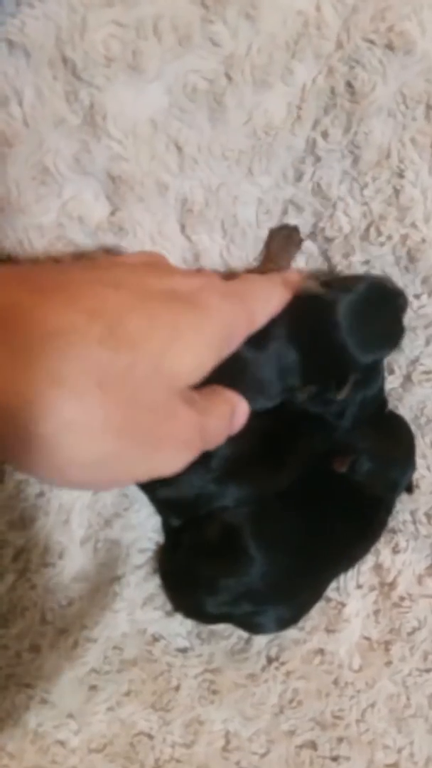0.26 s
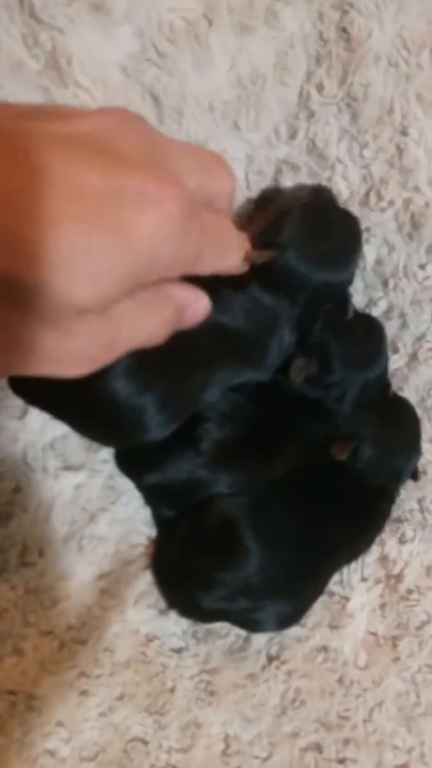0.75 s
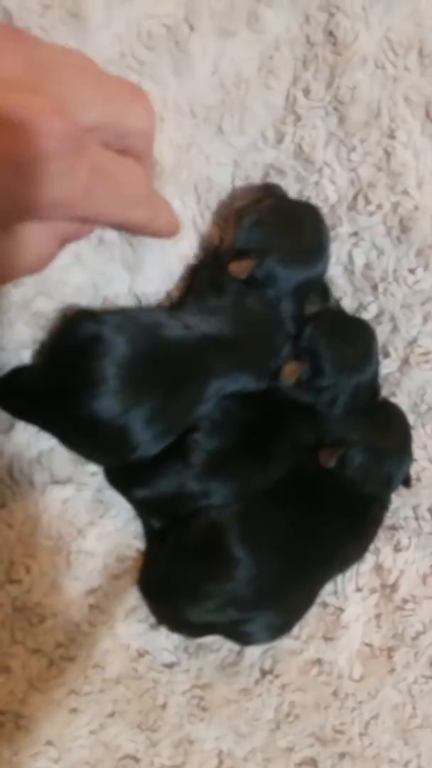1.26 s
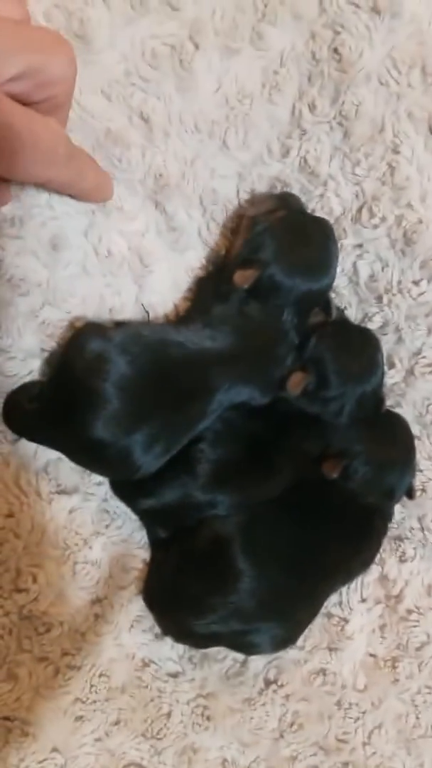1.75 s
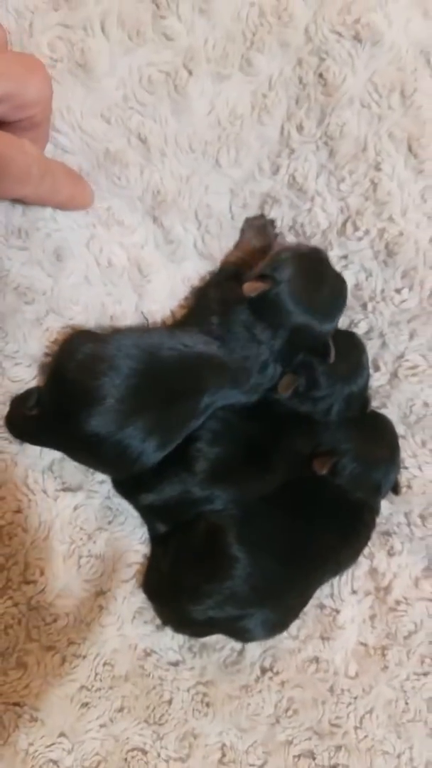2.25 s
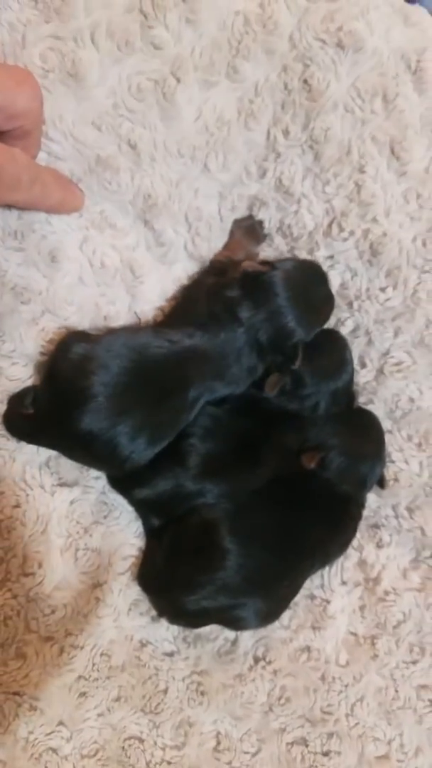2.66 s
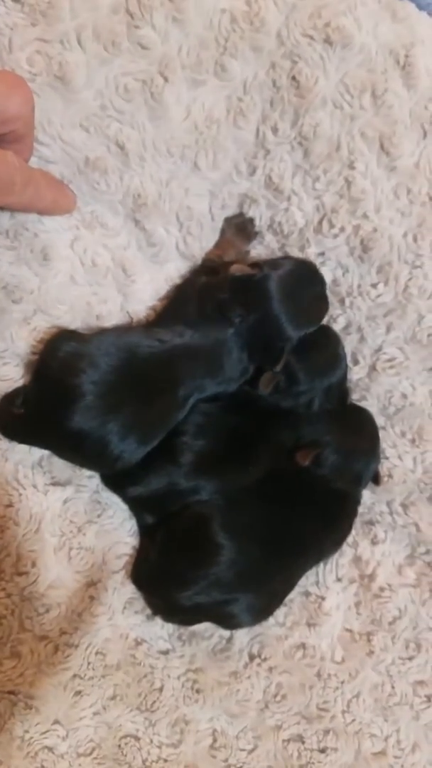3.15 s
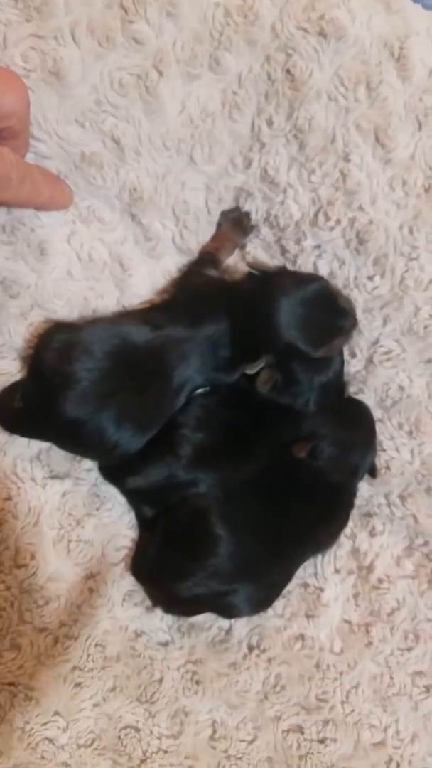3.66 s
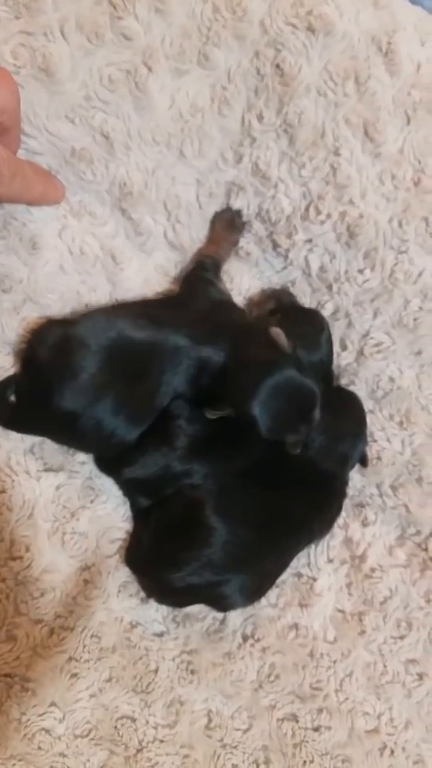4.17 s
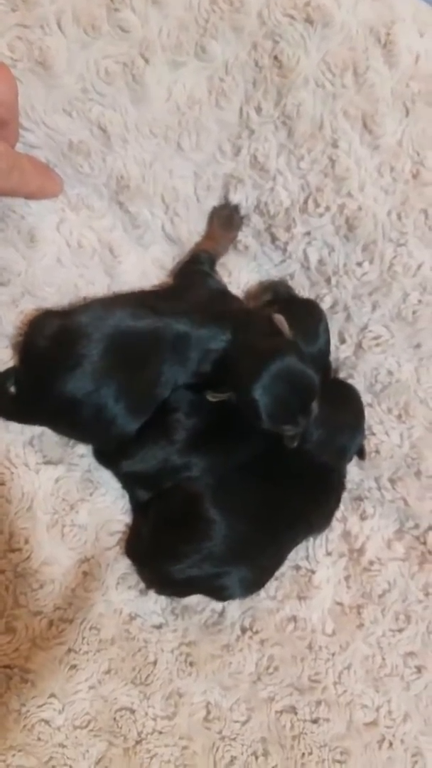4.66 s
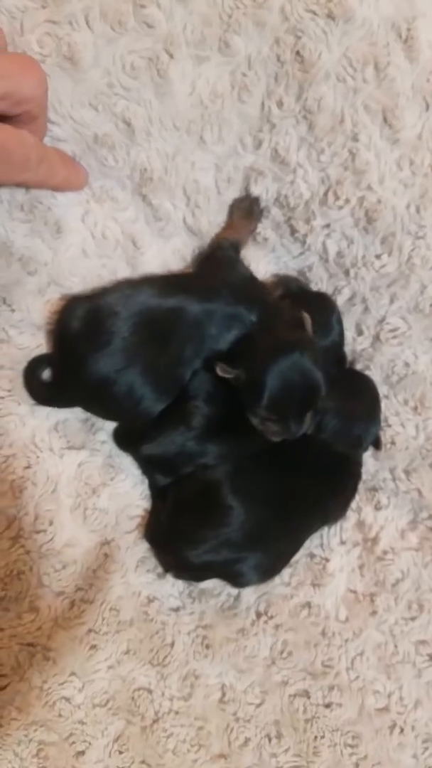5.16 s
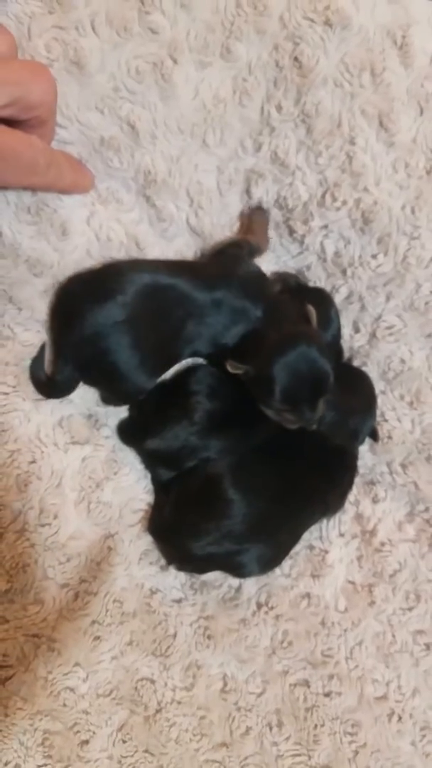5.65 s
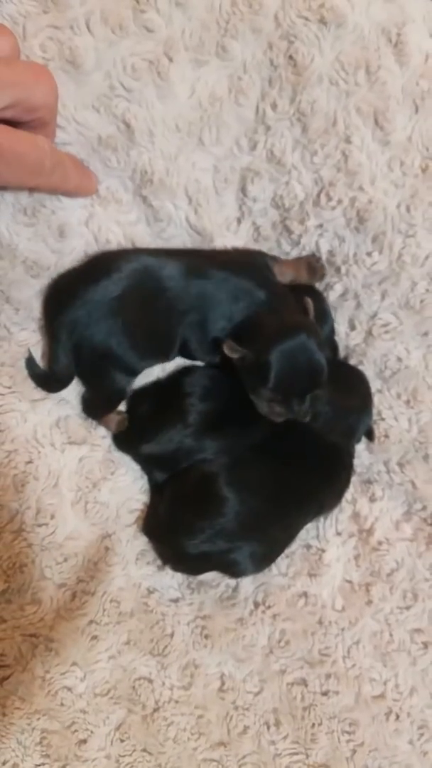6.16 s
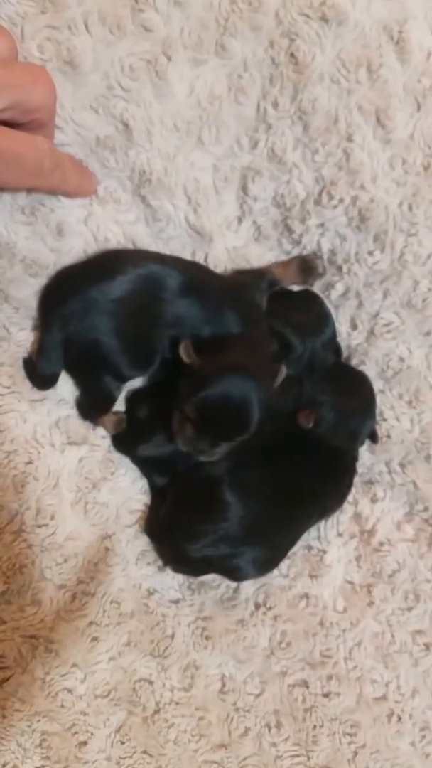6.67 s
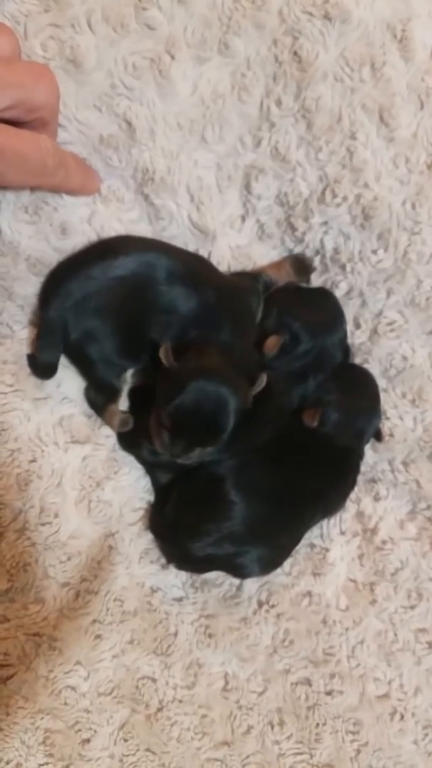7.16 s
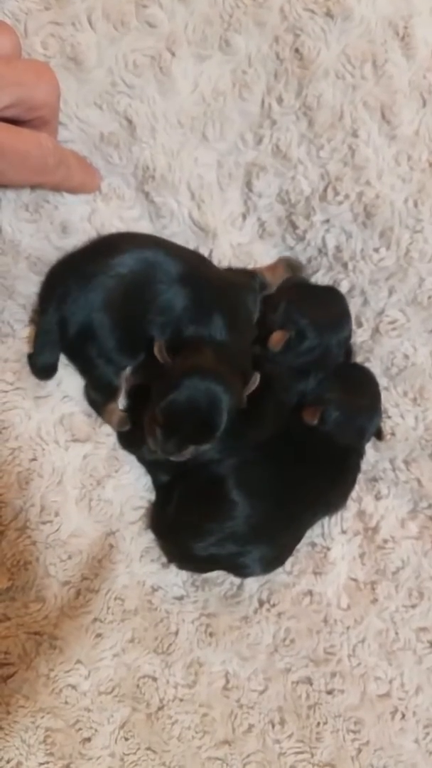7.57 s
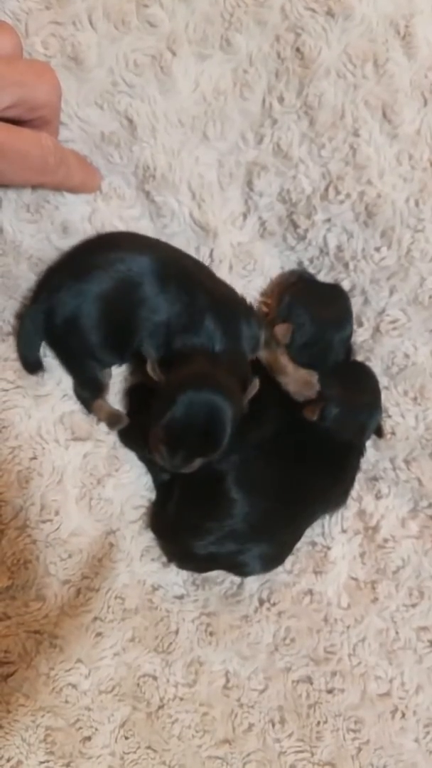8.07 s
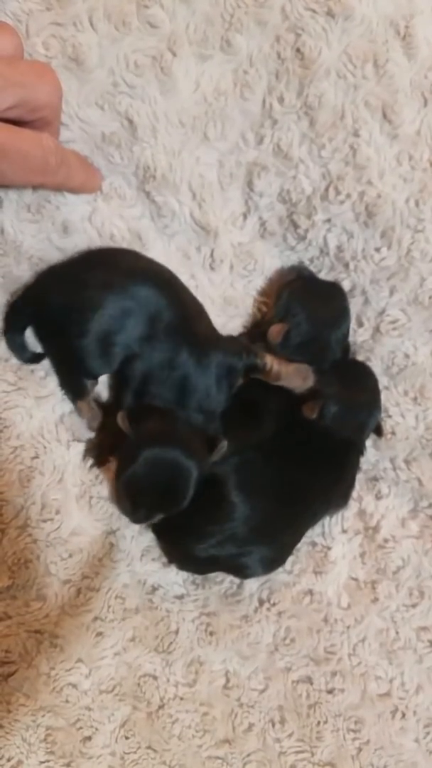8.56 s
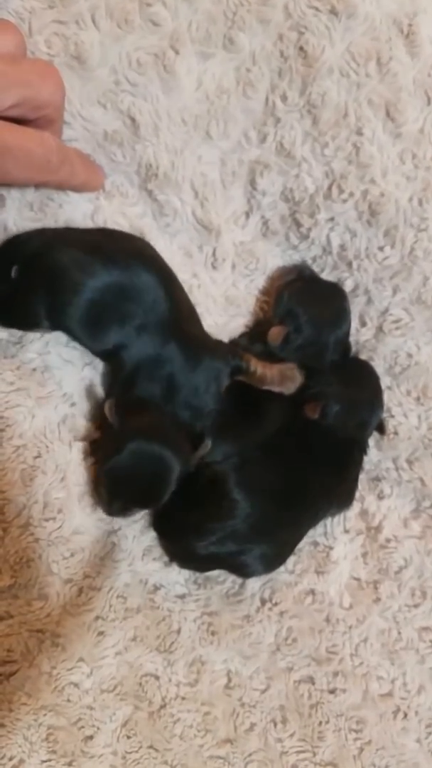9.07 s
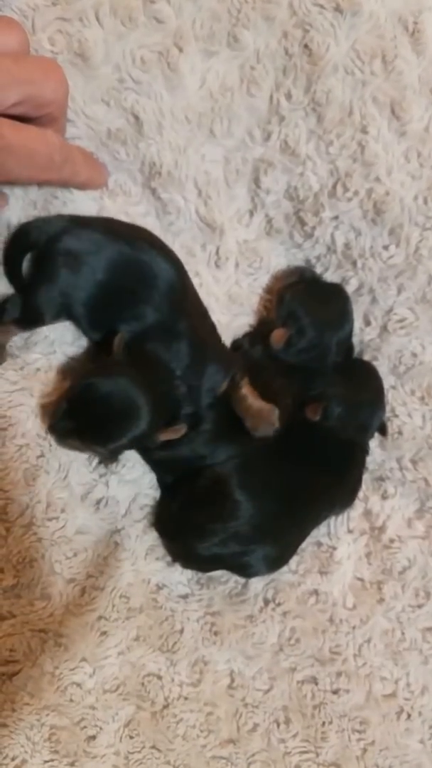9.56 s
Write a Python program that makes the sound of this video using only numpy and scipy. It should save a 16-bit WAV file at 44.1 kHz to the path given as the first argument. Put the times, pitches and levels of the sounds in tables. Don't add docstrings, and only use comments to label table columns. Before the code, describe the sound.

Tiny puppy's thin, wavering whimpers grow into high arching yelps close by, with soft handling knocks, microphone hiss and muffled far barks.

```python
import sys
import numpy as np
from scipy import signal
from scipy.fft import rfft, irfft, next_fast_len
from scipy.io import wavfile
from scipy.ndimage import uniform_filter1d, map_coordinates

SR = 44100
rng = np.random.default_rng(int(sys.argv[2]) if len(sys.argv) > 2 else 0)


def undo_db(level):
    steps = np.asarray(level, float) / 20
    return 10 ** steps


def inscribe(sig):
    pcm = np.round(np.clip(np.atleast_2d(sig).T, -1, 1) * 32767)
    wavfile.write(sys.argv[1], SR, pcm.astype(np.int16))


N = 433062

# frequency in Hz, level in dB.
THROAT = [(200, -33), (460, -17), (1000, -11), (1760, 1.5), (2450, -11), (3100, -20.5), (4000, -17),
          (4900, -37), (6000, -61)]
# frequency in Hz, level in dB.
SIZZLE = [(3800, -60), (4700, -1), (5650, -7), (6600, -4.5), (8500, 0), (9800, -15), (11300, -8.5),
          (12900, -20.5), (15300, -5)]


def unit(x):
    return x / np.sqrt(np.mean(x ** 2) + 1e-20)


def along(points, hz):
    f, v = np.transpose(points)
    return np.interp(np.log(hz + 1), np.log(f + 1), v)


def curve(rows):
    s, value = np.transpose(rows)
    return np.interp(np.arange(N) / SR, s, value)


def bumps(rows):
    out = np.zeros(N)
    for s, long, high in rows:
        at = np.arange(round((s - long / 2) * SR), min(round((s + long / 2) * SR), N))
        out[at] += high * np.cos(np.pi * (at / SR - s) / long) ** 2
    return out


def wobble(rate):
    knots = rng.standard_normal(int(N * rate / SR) + 4)
    return map_coordinates(knots, [np.arange(N) * rate / SR])


def peak(s, db, rise_db_per_s, fall_db_per_s):
    t = np.arange(N) / SR - s
    return undo_db(db + np.minimum(rise_db_per_s * t, -fall_db_per_s * t))


def filtered(x, response):
    m = next_fast_len(N + SR // 2)
    return irfft(rfft(x, m) * response(np.fft.rfftfreq(m, 1 / SR)), m)[..., :N]


def hiss(spectrum):
    return unit(filtered(rng.standard_normal(N), lambda hz: undo_db(along(spectrum, hz))))


def resonances(modes):
    def response(f):
        return sum((-1) ** k * undo_db(db) * 1j * f * w / (c * c - f * f + 1j * f * w)
                   for k, (c, w, db) in enumerate(modes))
    return response


def hump(f, centre, width):
    return np.exp(-((f - centre) / width) ** 2)


def background():
    # frequency in Hz, density in dB per Hz.
    hush = [(20, -14), (40, -17.5), (100, -6.5), (200, -11.5), (600, -16), (1600, -19), (3000, -24.5),
            (6000, -30), (8000, -26), (10000, -29.5), (15800, -31)]
    # frequency in Hz, left-right likeness 0-1.
    alike = [(30, .2), (80, .6), (140, .55), (300, .8), (700, 0.43), ]
    # frequency in Hz, left-right difference in dB.
    lean = [(100, -2), (1500, -2), (4000, -1), (7000, 1), (9000, 3), (12500, .1)]
    # time in seconds, gain in dB.
    creeping = [(0, -3), (2.5, -3), (4.6, -3.5), (6.6, -1.2), (8.5, -1.2), (9.8, 3)]
    # frequency in Hz, width in Hz, level in dB.
    hums = [(75, 10, -82), (104, 10, -82), (256.4, 6.3, -77.5)]
    # frequency in Hz, density in dB per Hz.
    brushing = [(500, -31.5), (1300, -16.5), (2000, -1), (5000, -11.5), (7700, -5.5), (12000, -24)]
    rumble_db, rumble_grows, hiss_db = -72.3, 1.5, -74.5
    resting_db = -78

    def angle(hz):
        return np.arccos(np.clip(along(alike, hz), -1, 1)) / 2

    def mid_side(hz):
        return undo_db(along(hush, hz)) * [np.cos(angle(hz)), np.sin(angle(hz))]

    mid, side = filtered(rng.standard_normal((2, N)), mid_side)
    halves = np.array([[.5], [-.5]])
    air = filtered(np.array([mid + side, mid - side]), lambda hz: undo_db(along(lean, hz) * halves))
    low = filtered(air, lambda hz: 1 / (1 + (hz / 300) ** 4))

    def band_rms(lo, hi):
        return np.std(filtered(mid, lambda hz: (hz > lo) & (hz < hi)))

    gain_db = curve(creeping)
    rumble = undo_db(rumble_db + rumble_grows * gain_db + 1.2 * wobble(3)) * low / band_rms(40, 220)
    high = undo_db(hiss_db + gain_db) * (air - low) / band_rms(5000, 15000)
    drone = np.zeros(N)
    for hz, width, db in hums:
        hum = unit(filtered(rng.standard_normal(N), resonances([(hz, width, 0)])))
        drone += undo_db(db + gain_db + 2.3 * wobble(1.5)) * hum
    stroke = peak(1.52, -64.5, rise_db_per_s=27, fall_db_per_s=40)
    rustle = (undo_db(resting_db) + stroke) * undo_db(2 * wobble(25)) * np.array([hiss(brushing), hiss(brushing)])
    return rumble + high + drone + rustle


def phrases():
    # time in seconds, pitch in Hz, level in dB.
    soft = [
        [(0.057, 385, -51), (0.093, 372, -52.5), (0.128, 438, -46), (0.143, 438, -55)],
        [(0.446, 492, -60), (0.453, 428, -54.5), (0.505, 335, -49.5), (0.543, 428, -48), (0.606, 466, -44),
         (0.612, 445, -59)],
        [(0.92, 393, -53.5), (0.962, 344, -56), (0.988, 448, -50.5), (1.008, 386, -57.5)],
        [(1.624, 370, -54), (1.664, 529, -54), (1.712, 529, -43), (1.812, 532, -41.5), (1.828, 370, -42),
         (1.842, 322, -55)],
        [(2.086, 328, -51), (2.104, 361, -54.5), (2.11, 519, -48), (2.248, 620, -36.5), (2.257, 783, -38.5),
         (2.357, 600, -37.5), (2.364, 410, -46)],
        [(2.959, 548, -54), (2.97, 496, -54.5), (3.023, 468, -54), (3.066, 508, -50.5), (3.085, 440, -64)],
        [(3.36, 425, -57), (3.388, 400, -54), (3.394, 450, -51), (3.43, 425, -50), (3.47, 380, -51),
         (3.49, 340, -58)],
    ]
    # time in seconds, pitch in Hz, level in dB.
    whines = [
        [(4.161, 489, -52), (4.212, 449, -52), (4.246, 379, -47.7), (4.261, 294, -52), (4.267, 370, -63.5)],
        [(4.558, 640, -52), (4.575, 465, -53), (4.618, 443, -47), (4.686, 419, -46.5), (4.697, 308, -53)],
        [(5.003, 640, -55), (5.02, 500, -58), (5.04, 820, -62)],
        [(5.317, 611, -48.5), (5.336, 490, -48.5), (5.42, 485, -38), (5.485, 515, -33), (5.592, 594, -30.5),
         (5.611, 431, -38)],
        [(6.34, 299, -47), (6.348, 406, -42), (6.438, 518, -34), (6.568, 500, -32.5), (6.606, 464, -33),
         (6.652, 589, -32.5), (6.661, 435, -41)],
        [(6.93, 415, -49.5), (6.948, 419, -42.5), (6.956, 394, -42), (6.978, 396, -46.5), (7.0, 286, -54.5)],
        [(7.244, 443, -48), (7.297, 499, -41.5), (7.324, 500, -36.5), (7.371, 574, -36), (7.485, 570, -32),
         (7.506, 378, -46.5)],
    ]
    # time in seconds, pitch in Hz, level in dB.
    yelps = [
        [(5.854, 902, -46), (5.864, 812, -35), (5.893, 1005, -30), (5.935, 1200, -31.7), (5.983, 1511, -22),
         (6.08, 1644, -22), (6.094, 1400, -31)],
        [(6.097, 1250, -33), (6.106, 1150, -32), (6.121, 1000, -27.5), (6.138, 850, -36)],
        [(7.72, 481, -50), (7.726, 554, -42.5), (7.784, 814, -32), (7.832, 873, -28), (7.878, 596, -29),
         (7.908, 500, -36), (7.92, 400, -43)],
        [(8.122, 369, -42.5), (8.144, 586, -45), (8.15, 718, -36), (8.216, 856, -26.5), (8.305, 528, -33),
         (8.338, 480, -37), (8.348, 330, -43)],
        [(8.558, 480, -49), (8.617, 522, -41), (8.623, 746, -35), (8.685, 833, -29), (8.748, 670, -29.5),
         (8.779, 412, -46)],
        [(9.005, 475, -44), (9.03, 574, -42.5), (9.05, 783, -35), (9.078, 865, -28.5), (9.118, 1015, -27),
         (9.15, 1150, -34), (9.173, 1222, -36), (9.198, 880, -25), (9.222, 560, -38)],
        [(9.46, 391, -45), (9.525, 535, -37), (9.548, 505, -35.5), (9.6, 635, -30.5), (9.711, 628, -32),
         (9.765, 590, -31), (9.789, 396, -42)],
    ]
    # start in seconds, length in seconds, pitch in Hz, level in dB, swell in dB.
    squeaks = [
        (1.6, .02, 1130, -58, -1.5),
        (4.107, .05, 915, -51, -4),
        (4.533, .02, 915, -54, 3),
        (4.71, .04, 850, -62, -3),
        (4.987, .014, 880, -53, 1.5),
        (7.7, .017, 1180, -56.5, 4.5),
        (8.114, .008, 1330, -52, 3),
    ]
    rise = 1.03
    thin = [[(s, hz, db), (s + long, hz * rise, db + swell)] for s, long, hz, db, swell in squeaks]
    return soft + whines + yelps + thin


def vocal_folds():
    # time in seconds, share by which the pitch drops.
    quavers = [(0.561, 0.05), (0.932, 0.093), (0.993, 0.176), (1.654, 0.12), (1.674, 0.328), (1.712, 0.324),
               (1.764, 0.203), (2.146, 0.361), (2.196, 0.29), (2.258, 0.33), (2.298, 0.232), (3.027, 0.14),
               (4.621, 0.12), (5.381, 0.116), (5.424, 0.36), (5.473, 0.23), (5.527, 0.237), (5.57, 0.256),
               (6.103, 0.13), (6.372, 0.1), (6.464, 0.248), (6.518, 0.193), (7.31, 0.19), (7.363, 0.177),
               (7.422, 0.136), (8.275, 0.115), (9.128, .045), (9.62, 0.07), (9.669, 0.1), (9.729, 0.156)]
    # time in seconds, share by which the pitch drops (below 0 = tighter).
    twitches = [(1.64, -.05), (1.651, .05), (1.665, .06), (1.69, .05), (1.735, .05), (2.105, -.03),
                (2.16, -.03), (2.18, -.06), (2.245, .05), (2.285, .045), (3.035, -.03), (4.17, .07),
                (4.562, .07), (5.365, .03), (5.43, .05), (5.485, -.04), (5.513, .03), (5.55, .03),
                (5.59, .04), (5.867, .06), (5.945, -.03), (6.357, -.035), (6.407, .055), (6.452, .03),
                (6.574, .05), (7.322, -.03), (7.765, .055), (7.882, .04), (8.124, .06), (8.142, -.05),
                (8.585, -.03), (8.757, .05), (9.02, -.04), (9.204, .07), (9.462, .05), (9.486, .06),
                (9.52, .04), (9.585, .02), (9.775, .07)]
    # time in seconds, length in seconds, noise share 0-1.
    breaks = [(1.83, .03, .4), (5.415, .04, .6), (5.61, .02, .4), (6.095, .03, .6), (6.665, .02, .4),
              (6.985, .035, .55), (7.493, .03, .5), (9.775, .03, .4), (2.095, .03, .45), (2.145, .03, .25),
              (1.67, .035, .5), (6.343, .02, .5), (7.248, .02, .6), (7.3, .02, .25), (7.912, .02, .5),
              (8.128, .03, .5), (8.343, .02, .5), (8.56, .02, .5), (8.755, .03, .35), (9.465, .03, .4),
              (9.72, .02, .25), (9.6, .4, .06), (6.5, .4, .05)]
    quaver_s, twitch_s, breathy = .055, .028, .03
    drops = [(s, quaver_s, drop) for s, drop in quavers] + [(s, twitch_s, drop) for s, drop in twitches]
    slack = np.exp(-bumps(drops) + .004 * wobble(120))
    return slack, np.clip(breathy + bumps(breaks), 0, 1)


def setting(rows, start_s):
    return [row for row in rows if row[0] <= start_s][-1][1:]


def treble_colour(start_s):
    # start in seconds, levels near 4.65, 5.7, 9.8 and 12 kHz in dB.
    colours = [(0, 1.2, 2.2, 3, 4), (1.55, .1, -1.2, -4, 5), (2.05, -2.2, .1, -1.2, -1.2),
               (2.9, .1, -3, .1, .1), (4.3, .1, .1, -5, 2.2), (4.9, .1, -4, -8, .1), (5.3, -13, -3, 4, 6),
               (5.8, -9, -3, -5, 6), (6.09, -3, -7, -1.2, .1), (6.3, -4, .1, -10.5, -1.2),
               (6.9, .1, -11, -6, 2.2), (7.2, 4, -3, 1.2, 3), (7.65, 1.2, -1.2, -3, -5),
               (8.1, 2.2, 5, 1.2, -3), (8.5, 3, 2.2, -7, 4), (8.95, -4, -1.5, -9, 3), (9.4, 8, -9, -4, 6)]
    # centre in Hz, width in Hz.
    bands = [(4650, 400), (5650, 420), (9800, 550), (12000, 1500)]
    levels = setting(colours, start_s)
    return lambda f: sum(db * hump(f, c, w) for db, (c, w) in zip(levels, bands))


def mouth_filter(mouth, closing, stretch, low_db, dip_db, chin_db, tongue_turn, shade):
    # frequency in Hz, level in dB.
    nasal = [(200, -22), (400, -5), (750, 2), (1200, -11.5), (1800, -7.5), (2550, -14), (3200, -20.5),
             (5000, -45)]
    muffle_db, muffle_hz = 9, 1000
    tuck = .55
    ripple_db, ripple_hz = 1.5, 1300

    def gain(f):
        db = mouth * along(THROAT, f / stretch) + (1 - mouth) * along(nasal, f) + shade(f)
        db = db + low_db * hump(f, 1000, 400) + dip_db * hump(f, 2900, 450)
        db = db + ripple_db * np.sin(2 * np.pi * f / ripple_hz + tongue_turn)
        db = db - muffle_db * (1 - closing) * np.clip(f / muffle_hz - 1, 0, 2)
        return undo_db(db + chin_db * (hump(f, 3700, 800) - tuck * mouth * hump(f, 2600, 400)))
    return gain


def sizzle_filter(lift_db, shine_db, shade):
    lower_share = 1.4

    def gain(f):
        lifted_db = lift_db * (lower_share * hump(f, 5400, 1000) + hump(f, 12400, 2000))
        return undo_db(along(SIZZLE, f) + shade(f) + shine_db * hump(f, 8500, 1100) + lifted_db)
    return gain


def stack(hz, phase, gain, lag, top):
    order = np.arange(1, int(top / hz.min()) + 1)[:, None]
    coarse = order * hz[::16]
    size = gain(coarse) * (coarse < top)
    size = size * np.sqrt(2 / (size ** 2).sum(0))
    size, turn = (np.repeat(v, 16, 1)[:, :len(hz)] for v in (size, lag(coarse)))
    return (size * np.cos((order * (phase % (2 * np.pi)) - turn).astype(np.float32))).sum(0)


def puppy():
    # start in seconds, mouth opening 0-1, sizzle over the level in dB, # chin
    # lift in dB, sizzle's treble lift near 12.4 kHz in dB.
    manner = [(0, .72, -24, -9, -5), (.4, .72, -27, -9, -5), (.9, .45, -21, -3, -5),
              (1.55, .78, -26, 2.5, -3), (2.05, .82, -27, -2, -1.5), (2.9, .5, -29, -4, 0.1),
              (3.3, .6, -31, -8, 0.1), (4.05, .88, -31, -6, -3), (4.5, .68, -31, -3, -3),
              (4.705, .01, -29, -5, 0.1), (4.9, .6, -26, -4, 3), (5.3, .97, -32.5, -4, 4),
              (5.8, 1.05, -31, -8, 3), (6.09, .97, -38, 6, .1), (6.3, .97, -29, 0.1, -6),
              (6.9, .1, -25, 0.1, -3), (7.2, .9, -28, 0.1, -6), (7.65, .85, -31, -1.5, 1.5),
              (8.1, .85, -25, 1.2, 7), (8.5, .62, -28.5, 2.2, 12), (8.95, .8, -26, -1.5, 9),
              (9.4, .85, -24, 3, -15)]
    # start in seconds, resonance stretch as a ratio, levels near 1, 2.9 and
    # 8.5 kHz in dB.
    tract = [(0, 1.01, .1, -4, 3), (.4, 1.04, 1, 1.5, 3), (.9, 1.01, -4, 5, .1), (1.55, .97, .1, 2.5, .1),
             (2.05, 1.01, 1.5, -1, .1), (2.9, 1.04, 2.5, -2.5, .1), (3.3, 1.22, .1, -9, .1),
             (4.05, 1.01, -.4, -4.5, .1), (4.5, 1.01, 3, -6.5, -3), (4.705, 1.01, .1, .1, .1),
             (4.9, 1.01, -1.2, -8, -4), (5.3, 1.03, 2.5, -4, .1), (5.8, 1.03, -2.5, -6, -1.2),
             (6.09, .62, .1, 6, -9), (6.3, 1.01, -1.2, -4, .1), (6.9, .95, .1, -2.2, -5),
             (7.2, 1.01, 1.5, .1, .1), (7.65, 1.04, 1.5, 5, 1.2), (8.1, 1.01, -1.5, 2.5, 3.5),
             (8.5, 1.07, -3, -1.5, -7), (8.95, 1.01, -2.2, 4, -9), (9.4, 1.01, -4, -3, 2.5)]
    # frequency in Hz, density in dB per Hz.
    chest = [(40, -10), (80, .1), (280, -3), (500, -30), (2000, -60)]
    chest_db, puff_t60 = -45, .09
    open_s, shut_s, ajar = .05, .025, .7
    purse_hz, purse_span_hz, pursed_db = 1050, 500, 16
    slump_glide, slump_shuts = 8, 9
    leak_db, leak_glide = 4.5, 5
    burst_db, burst_s = 7, .025
    strain_db_per_s, linger_s = 15, .008

    slack, noisy = vocal_folds()
    fizzy = np.clip(.22 + noisy, 0, 1)
    rasp, fizz, heave = hiss(THROAT), hiss(SIZZLE), hiss(chest)
    shimmer_db, tongue_turn = .8 * wobble(60), 1.5 * wobble(14)
    out = np.zeros(N)
    for cry in phrases():
        s, pitch, level = np.transpose(cry)
        wide, air_db, chin_db, lift_db = setting(manner, s[0])
        stretch, low_db, dip_db, shine_db = setting(tract, s[0])
        shade = treble_colour(s[0])
        at = np.arange(round((s[0] - .002) * SR), min(round((s[-1] + 0.0056) * SR), N))
        age = at / SR - s[0]
        level_db = np.interp(at / SR, s, level)

        line = np.exp(np.interp(at / SR, s, np.log(pitch)))
        line = uniform_filter1d(line, size=640, mode="nearest")
        hz = line * slack[at]
        phase = 2 * np.pi * np.cumsum(hz) / SR
        log_rate = np.gradient(np.log(line)) * SR

        slump = np.cumsum(np.clip(-log_rate - slump_glide, 0, None) * (age > open_s)) / SR
        closing = np.exp(-slump_shuts * slump)
        shuts = np.clip((age[-1] - age) / shut_s, 0, 1) * closing if len(s) > 2 else 1
        pursed = np.clip((np.maximum.accumulate(line) - purse_hz) / purse_span_hz, 0, 1)
        mouth = (wide * np.clip(ajar + (1 - ajar) * age / open_s, 0, 1) - pursed) * shuts
        mouth = np.clip(mouth[::16], -.3, 1.4)

        opening = mouth_filter(mouth, closing[::16], stretch, low_db, dip_db, chin_db,
                               tongue_turn[at][::16], shade)
        tone = stack(hz, phase, opening, lambda f: np.pi + 2.47 * np.arctan((f - 1750) / 400), 7000)
        voice = np.sqrt(1 - noisy[at] ** 2) * tone + noisy[at] * rasp[at]

        glide = uniform_filter1d(log_rate, size=1500, mode="nearest")
        sizzle_db = air_db - leak_db * np.tanh(glide / leak_glide) + burst_db * np.exp(-age / burst_s)
        sizzle_db += strain_db_per_s * age
        sizzle_db -= pursed_db * np.clip((line - purse_hz) / purse_span_hz, 0, 1)
        sizzle_db += np.clip(np.interp(at / SR - linger_s, s, level) - level_db, 0, None)
        sizzle_gain = sizzle_filter(lift_db, shine_db, shade)
        m = next_fast_len(len(at))
        air = irfft(rfft(rng.standard_normal(m)) * sizzle_gain(np.fft.rfftfreq(m, 1 / SR)), m)
        air = unit(air)[:len(at)]
        bright = stack(hz, phase, sizzle_gain, lambda f: f / 900, 15800)
        top = (1 - .7 * pursed) * np.sqrt(1 - fizzy[at] ** 2) * bright
        top += fizzy[at] * (1 + np.cos(phase)) * air * np.sqrt(2 / 3)

        edge = np.clip(np.minimum(at - at[0], (at[-1] - at) / 3) / 70, 0, 1)
        sound = voice + undo_db(sizzle_db) * top + undo_db(chest_db) * heave[at]
        out[at] += edge * undo_db(level_db + shimmer_db[at]) * sound
        after = np.arange(at[-1] - 200, min(at[-1] + 2500, N))
        puff_db = level_db[-1] + sizzle_db[-1] + 1.5 - 60 * (after - after[0]) / SR / puff_t60
        out[after] += undo_db(puff_db) * fizz[after]
    return out


def ports(x, aim):
    side = np.array([[.5], [-.5]])
    return filtered(x, lambda hz: undo_db(side * along(aim[0], hz)) * np.exp(1j * side * along(aim[1], hz)))


def room(x, delay):
    # frequency in Hz, decay time t60 in seconds.
    decay = [(200, 0.79), (1500, 0.45), (2300, .45), (4000, 0.55), (12000, 0.12)]
    hz, t, z = signal.stft(rng.standard_normal((2, SR // 2)), SR, nperseg=256)
    tail = signal.istft(z * undo_db(-60 * t / along(decay, hz)[:, None]), SR, nperseg=256)[1]
    tail = tail / np.linalg.norm(tail[0])
    return signal.fftconvolve(np.pad(x, (delay, 0))[None], tail, axes=1)[:, :N]


def tongue():
    # time in seconds, peak in dB.
    ticks = [(0.441, -50), (2.0602, -49), (3.3124, -55.5), (4.104, -52), (4.98, -50), (6.907, -57),
             (7.218, -49), (7.243, -48), (8.094, -52), (8.5465, -44), (8.5574, -48), (8.987, -50),
             (8.999, -47), (9.4474, -46)]
    out, t = np.zeros(N), np.arange(400) / SR
    for s, db in ticks:
        click = np.sin(2 * np.pi * 2200 * t) * undo_db(-60 * t / 0.0063)
        click += .15 * rng.standard_normal(len(t)) * undo_db(-60 * t / .002)
        out[round(s * SR):][:len(t)] += undo_db(db + 4.5) * click
    return out


def fingers():
    # time in seconds, peak in dB.
    taps = [(0.776, -49.5), (0.81, -48.5), (0.86, -49), (0.899, -50.5), (0.983, -48.5), (1.597, -56),
            (1.933, -50), (2.002, -51), (2.459, -49.5), (2.509, -51), (2.564, -50), (2.599, -51),
            (2.917, -54), (3.185, -54), (4.714, -51), (4.757, -52), (4.792, -50), (4.807, -52),
            (4.845, -51), (4.869, -54), (4.905, -49.5), (4.933, -54), (4.964, -49.5), (5.034, -50),
            (5.068, -52), (5.153, -50.5)]
    out, t = np.zeros((2, N)), np.arange(700) / SR
    for s, db in taps:
        tune, grip, nail = rng.standard_normal(3)
        push = np.sin(2 * np.pi * 330 * undo_db(2 * tune) * t) * undo_db(-60 * t / .017) * (1 - np.exp(-t / 0.00053))
        snap = np.sin(2 * np.pi * 900 * t) * undo_db(-7 + 2.5 * nail - 60 * t / 0.0052)
        side_db = np.array([[-.5], [.5]]) * (8 + 2 * grip)
        out[:, round((s + .003) * SR):][:, :len(t)] -= undo_db(db + 1.5 + side_db) * (push + snap)
    return out


def nails():
    # time in seconds, peak in dB.
    clicks = [(0.8094, -60), (0.8594, -59), (0.8994, -51), (2.0058, -56), (2.567, -53), (2.6505, -54),
              (2.6713, -56), (2.9174, -62), (3.1854, -57), (4.7595, -56), (4.8475, -52), (4.9072, -58),
              (4.9665, -55), (5.0719, -53), (5.0918, -52), (5.7994, -54), (9.3994, -49)]
    out, t = np.zeros(N), np.arange(300) / SR
    for s, db in clicks:
        out[round(s * SR):][:len(t)] += undo_db(db + 5.5 - 60 * t / .0042) * np.sin(2 * np.pi * 1250 * t)
    return out * undo_db([[-3], [3]])


def far_dog():
    # peak time in seconds, chest level in dB, rise in seconds, fall in seconds.
    barks = [
        (3.4, -43.5, .075, .15),
        (6.47, -45.5, .2, .09),
        (8.93, -41.5, .1, .2),
        (9.26, -51, .1, .07),
        (9.62, -50, .2, .2),
    ]
    # frequency in Hz, width in Hz, level in dB.
    jaws = [(615, 170, 2), (850, 220, 0.5), (1190, 170, -3), (1690, 230, .5)]
    # frequency in Hz, width in Hz, level in dB.
    gapes = [(625, 60, 5), (1150, 200, -15), (1740, 100, -4)]
    wider_from_s, wider_to_s = 6, 9.42
    pitch_hz, rough = 330, .82
    span_db = 20
    beat = np.cumsum(pitch_hz * (1 + .08 * wobble(40))) / SR
    pulses = unit(np.diff(np.floor(beat), prepend=0))
    turbulence = rng.standard_normal(N) * (1 + .5 * np.cos(2 * np.pi * beat))
    breath = (1 - rough) * pulses + rough * turbulence

    def wide_jaw(f):
        return resonances(gapes)(f) / (1 + (f / 3000) ** 4) * f ** 4 / (f ** 4 + 450 ** 4)

    gaping = unit(filtered(breath, wide_jaw))
    usual = unit(filtered(breath, resonances(jaws)))
    effort = sum(peak(s, db, span_db / rise, span_db / fall) for s, db, rise, fall in barks)
    t = np.arange(N) / SR
    wider = (t > wider_from_s) & (t <= wider_to_s)
    return uniform_filter1d(effort, size=400) * np.where(wider, gaping, usual)


def scene():
    # frequency in Hz, left-right difference in dB; then frequency in Hz, left lead in radians.
    aim_early = [(310, 0.5), (500, 4), (800, -3), (1150, -1.5), (1600, -6.5), (2400, -8.5), (4500, 7),
                 (9100, 7)], [(600, .05), (1040, 0.85), (2160, 1.98), (2680, 4.7), (5100, 5.25),
                 (9600, 11.66), (15900, 25.5)]
    aim_late = [(310, -5), (710, -2.5), (1100, -1.5), (1500, -6), (2400, -5.5), (4000, -7.5), (5700, -2.5),
                (11000, -2.5), (15100, -10)], [(310, .02), (2600, .6), (3700, 0.8), (4700, 1.4),
                (6150, 1.6), (9100, 1.5), (14100, 1.8)]
    settled_s = 4.3
    pup = puppy() + tongue()
    early = np.arange(N) < settled_s * SR
    before, after = pup * early, pup * ~early
    near = undo_db(1.4) * ports(before, aim_early) + undo_db(-0.02) * ports(after, aim_late)
    echoes = undo_db(-13) * room(before, delay=250) + undo_db(-14) * room(after, delay=250)
    dog = far_dog()
    far = undo_db([[-4.5], [-0.5]]) * dog + undo_db(.5) * room(dog, delay=100)
    return near + echoes + far + fingers() + nails() + background()


def low_pass(x):
    return signal.sosfilt(signal.butter(12, 16500, fs=SR, output="sos"), x)


def record(dry):
    kept = filtered(dry, lambda hz: hz < 15780)
    return low_pass(kept - .0005)


dry = scene()
out = record(dry)
inscribe(out)
```